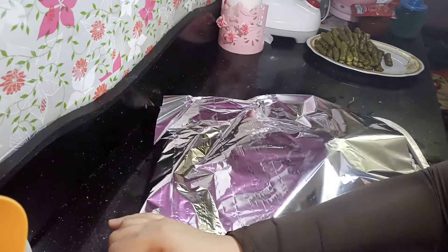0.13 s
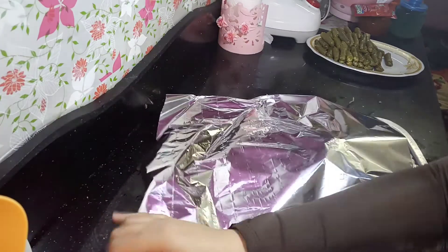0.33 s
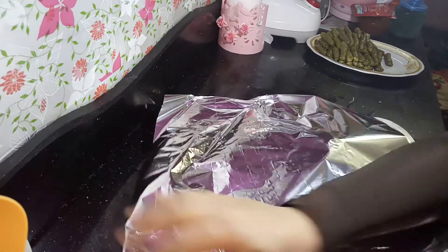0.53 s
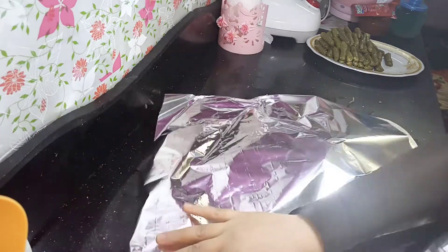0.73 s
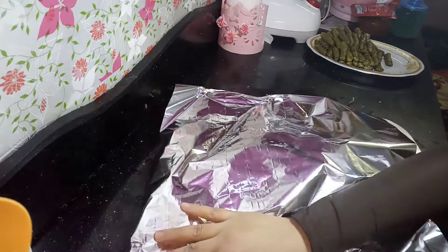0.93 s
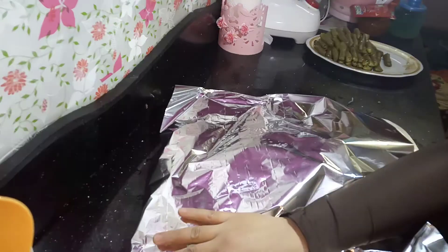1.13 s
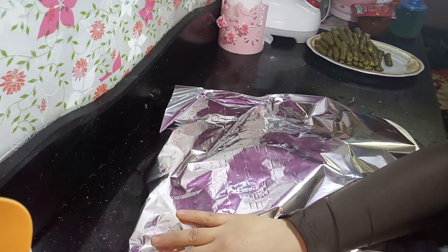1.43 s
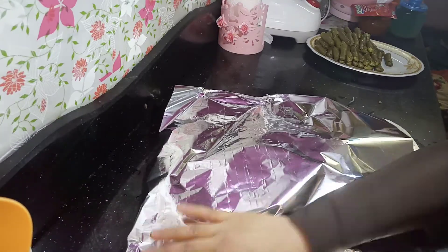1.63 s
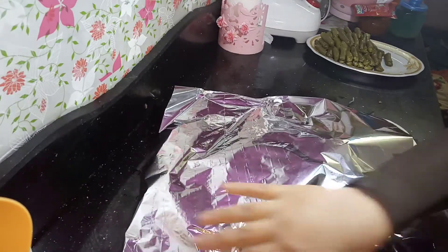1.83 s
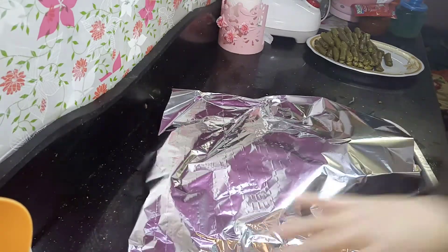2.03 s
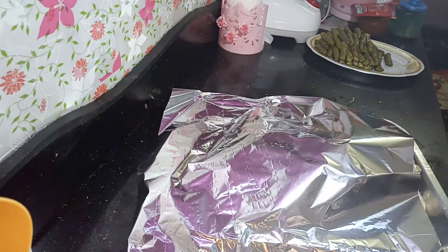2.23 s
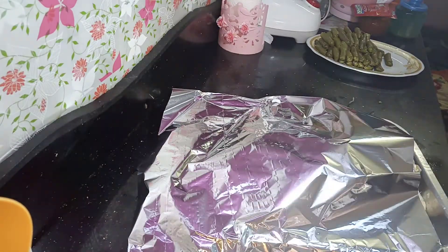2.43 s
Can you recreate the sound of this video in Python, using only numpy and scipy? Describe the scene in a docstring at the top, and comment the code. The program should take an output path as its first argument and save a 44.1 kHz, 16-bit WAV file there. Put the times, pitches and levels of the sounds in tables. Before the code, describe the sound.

Aluminium foil crinkles brightly as a hand smooths it over a metal tray, with palm rubbing and small crease snaps. It eases briefly, then gives a sharp crackle and fades, close up in a small kitchen.

```python
"""Smoothing foil over a tray

A hand pulls aluminium foil over a metal tray and smooths it down, close up in a small kitchen.
Swarms of tiny buckles crinkle in the sheet, the palm rubs over it and single creases snap.
Now and then the whole sheet flaps or the tray is nudged; the room answers briefly over a faint rumble."""
import sys
import numpy as np
from scipy import signal
from scipy.fft import rfft, irfft, next_fast_len
from scipy.io import wavfile
from scipy.ndimage import uniform_filter1d, map_coordinates

SR = 44100
rng = np.random.default_rng(int(sys.argv[2]) if len(sys.argv) > 2 else 0)


def generate_wav(signal):
    """Clip the signal to [-1, 1] and save it as 16-bit WAV at the path in sys.argv[1]."""
    frames = np.transpose(np.atleast_2d(signal))
    scaled = np.clip(frames, -1, 1) * 32767
    pcm = np.round(scaled).astype(np.int16)
    wavfile.write(sys.argv[1], SR, pcm)


N = 114660
ZONES = 7  # areas of the sheet, each on its own track
BUCKLE_SPREAD_DB = 2

# The hand's moves, as two fader rides (time [s], crinkle level [dB], rub level [dB])
HAND_MOVES = [(0.0, -26.5, -39), (0.049, -36, -45.5), (0.127, -28.5, -47), (0.161, -36, -42.5),
              (0.182, -18, -30), (0.24, -19, -31.5), (0.27, -24.5, -41), (0.343, -33.5, -41),
              (0.439, -26, -40.5), (0.621, -32, -46.5), (0.691, -25.5, -38.5), (0.776, -23.5, -33),
              (0.918, -28, -39), (1.1, -33.5, -43), (1.29, -34.5, -44), (1.45, -24.5, -39.5),
              (1.47, -28.5, -44), (1.5, -22, -39.5), (1.578, -37.5, -47.5), (1.679, -30.5, -43.5),
              (1.748, -39, -52), (1.768, -29, -47), (1.809, -49.5, -58.5), (1.886, -54.5, -55.5),
              (1.899, -33.5, -55), (1.925, -41.5, -55), (1.943, -27, -42), (2.009, -28, -40.5),
              (2.11, -41.5, -55), (2.149, -33, -51.5), (2.2, -37.5, -59), (2.218, -47.5, -54),
              (2.237, -16, -45), (2.251, -27.5, -48), (2.279, -27, -44.5), (2.291, -22, -61),
              (2.309, -34.5, -46.5), (2.389, -39, -55), (2.43, -33.5, -51), (2.469, -40, -56.5),
              (2.51, -32.5, -58), (2.53, -43, -58.5), (2.6, -49.5, -52)]
def crinkle(facets):
    """The sheet gives under the hand in clumps of tiny, bright buckles."""
    times, crinkle_db, _ = np.transpose(HAND_MOVES)
    t = np.arange(N) / SR
    clump_db, clumps_per_s, trim_db = 2.1, 50, -1
    clumps = clump_db * np.interp(t * clumps_per_s, np.arange(256), rng.standard_normal(256))
    level_db = np.interp(t, times, crinkle_db) + clumps + trim_db
    return swarm(level_db, facets, per_s=1200, spread_db=BUCKLE_SPREAD_DB, crowding=0.7)


def palm_rub(facets):
    """The palm moves in countless tiny slips: a dull rasp that also stirs the sheet's modes."""
    times, _, rub_db = np.transpose(HAND_MOVES)
    trim_db, stir_db = 2, 2.5
    level_db = np.interp(np.arange(N) / SR, times, rub_db) + trim_db
    slips = swarm(level_db, facets, per_s=3200, spread_db=7, crowding=0.34)
    return slips + amp(stir_db) * sheet_ring(slips.sum(axis=0)) / ZONES


# Accents from creases snapping through (time [s], relative level [dB])
CREASE_SNAPS = [(0.0937, -16.5), (0.164, -12.5), (0.208, -1), (0.2294, -7.5), (0.356, -17), (0.629, -14),
                (0.6644, -25), (0.694, -11), (0.757, -12), (0.816, -13), (0.949, -33), (1.1834, -14.5),
                (1.2394, -18), (1.393, -13), (1.449, -11), (1.484, -9.5), (1.655, -17), (1.8284, -29),
                (1.892, -19), (1.935, -18.5), (2.12, -18), (2.1847, -24), (2.2239, -7), (2.284, -15),
                (2.33, -22.5), (2.375, -22), (2.413, -19.5), (2.576, -31)]
def crease_snaps(facets):
    """Each crease gives way in a dense run of clicks; a big one has a slower attack."""
    envelope, t = np.full(N, 1e-5), np.arange(SR // 10) / SR
    slowest_rise_s, fade_s, trim_db = 0.003, 0.0093, -7.5
    biggest_db = max(db for _, db in CREASE_SNAPS)
    for start, db in CREASE_SNAPS:
        rise_s = slowest_rise_s * amp(db - biggest_db)
        add(envelope, start, amp(db + trim_db) * (1 - np.exp(-t / rise_s)) * np.exp(-t / fade_s))
    return swarm(20 * np.log10(envelope), facets, per_s=3000, spread_db=BUCKLE_SPREAD_DB, crowding=0)


def swarm(level_db, facets, per_s, spread_db, crowding):
    """A cloud of clicks on random facets, one track per zone; crowding makes loud stretches denser."""
    rate = per_s * amp(crowding * (level_db - level_db.mean()))
    fires = rng.random(N) < rate / SR
    kicks = fires * amp(spread_db * np.clip(rng.standard_normal(N), -2, 2))
    # Even out the power first, so that level_db alone rides the loudness.
    power = uniform_filter1d(uniform_filter1d(kicks ** 2, size=600), size=600)
    kicks = kicks / np.sqrt(np.abs(power) + 1e-6) * amp(level_db) * rng.choice([-1, 1], N)
    spot, zones = rng.integers(len(facets), size=N), np.zeros((ZONES, N))
    for i in np.flatnonzero(kicks):
        add(zones[spot[i] % ZONES], i / SR, kicks[i] * facets[spot[i]])
    return zones


# Tone curve of a buckle (frequency [Hz], level [dB])
BUCKLE_TONE = [(150, -34), (400, -12), (1100, -12), (1900, -4), (2900, 3), (3700, 5.5), (4700, 0),
               (7400, 0), (9600, -3.5), (12000, -2.5), (14400, 3.5), (16500, 2.5)]
def buckle_colour(hz):
    """A buckle's spectrum in dB: bright, with one broad resonance, the sheen, on top."""
    sheen_hz, width_hz, sheen_db = 7410, 1200, 14.5
    sheen = amp(sheen_db) ** 2 / (1 + (2 * (hz - sheen_hz) / width_hz) ** 2)
    return along(BUCKLE_TONE, hz) + 10 * np.log10(1 + sheen)


# Tone curve of the rubbing palm (frequency [Hz], level [dB])
SLIP_TONE = [(30, -45), (120, -7.5), (250, -13), (350, -12), (550, -7), (700, -6.5), (900, -2.5),
             (1400, -0.5), (2200, 0.5), (3000, 3.5), (4500, -6), (9000, -16), (16000, -48)]
def slip_colour(hz):
    """A slip's spectrum in dB: forward mids, little air."""
    return along(SLIP_TONE, hz)


def facet(colour, size=1024):
    """The grain from one spot of foil: a click and a short rattle through the sheet."""
    t = np.arange(size) / SR
    rattle = rng.standard_normal(size) * decay(t, t60=0.037)
    path = amp(3.5) * rattle / np.linalg.norm(rattle)
    path[0] += 1  # the direct click
    grain = signal.fftconvolve(path, click(colour, size))[:size]
    return grain / np.linalg.norm(grain)


def click(colour, size):
    """A sharp transient of the given colour, tinted at random."""
    hz = np.fft.rfftfreq(size, 1 / SR)
    tint_db = 1.5 * map_coordinates(rng.standard_normal(size=24), [np.linspace(0, 23, len(hz))])
    cepstrum = irfft(np.log(amp(colour(hz) + tint_db)))
    # Minimum phase packs the energy into the attack.
    cepstrum[1:size // 2] *= 2
    cepstrum[size // 2 + 1:] = 0
    pulse = irfft(np.exp(rfft(cepstrum)))
    return pulse / np.linalg.norm(pulse)


# EQ ride on the foil's upper mids (time [s], gain [dB])
MID_RIDE = [(0.9, -1), (1.4, -2), (1.5, -2.5), (2.0, -1), (2.15, -1)]
def thin_mids(foil):
    """The upper mids thin out a little, most around halfway, while the sheen stays."""
    gain = amp(np.interp(np.arange(N) / SR, *np.transpose(MID_RIDE)))
    mids = filtered(foil, lambda hz: np.interp(hz, [1700, 2600, 5500, 7000], [0, 1, 1, 0]))
    return foil + (gain - 1) * mids


# Modes of the sheet over the tray (frequency [Hz], relative level [dB], T60 [s])
SHEET_MODES = [(343, 2.5, 0.152), (497, -2, 0.15), (573, -2, 0.15), (577, -4, 0.035), (695, -1, 0.069),
               (786, 2, 0.076), (860, -5, 0.33), (1070, -4, 0.18), (1346, -7, 0.087)]
def sheet_ring(rub):
    """The sheet acts as a bank of resonators that gives the rub its body."""
    def resonance(f, hz, db, t60):
        width_hz = np.log(1000) / (np.pi * t60)
        return amp(db) * 1j * f * width_hz / (hz * hz - f * f + 1j * f * width_hz)
    return filtered(rub, lambda f: sum(resonance(f, *mode) for mode in SHEET_MODES))


# Flaps of the sheet (time [s], relative level [dB], centre pitch [Hz])
SHEET_FLAPS = [(.164, -26.5, 1360), (.186, -17, 1280), (.207, -21, 623), (.221, -25.5, 513),
               (.24, -23.5, 800), (.762, -30, 930), (.961, -30.5, 950), (1.182, -40, 342),
               (1.392, -40, 420), (1.44, -26, 505), (1.765, -37, 950), (1.893, -40, 996), (2.222, -30, 529)]
def sheet_flaps():
    """A panel of foil flaps with a quick, hollow pop."""
    return pushes(SHEET_FLAPS, SHEET_MODES, rise_s=0.0015, pop_t60_s=0.033)


# Modes of the tray on the counter (frequency [Hz], relative level [dB], T60 [s])
TRAY_MODES = [(62, -4, 0.12), (123, 7, 0.21), (172.5, -4.5, 0.35), (221, -1, 0.17), (356, 2.5, 0.11)]
# Bumps against the tray (time [s], relative level [dB], centre pitch [Hz])
TRAY_NUDGES = [(.165, -39.5, 302), (.222, -35, 147), (.651, -35, 176), (.72, -37, 170), (.756, -44, 177),
               (.787, -53, 177), (.893, -47, 197), (2.228, -38.5, 88.5)]
def tray_nudges():
    """Hand and fingers nudge the tray: soft, low knocks."""
    return pushes(TRAY_NUDGES, TRAY_MODES, rise_s=0.004, pop_t60_s=0.071)


def pushes(events, modes, rise_s, pop_t60_s):
    """A pushed spot swings briefly at its own sagging pitch and rings the modes nearest that pitch."""
    track, t = np.zeros(N), np.arange(SR // 4) / SR
    sag, reach_oct, modes_db = 0.13, 0.16, -5
    hz, mode_db, t60 = np.transpose(modes)
    rise, fade = 1 - np.exp(-t / rise_s), decay(t, pop_t60_s)
    mode_tones = np.exp(np.outer(2j * np.pi * hz - np.log(1000) / t60, t))
    for start, db, centre_hz in events:
        pitch = centre_hz * (1 + sag * (fade - 0.5))
        pop = fade * np.sin(2 * np.pi * np.cumsum(pitch) / SR)
        detune = np.log2(hz / centre_hz) / reach_oct
        gains = amp(modes_db + mode_db + rng.normal(0, 2.0, len(hz))) / (1 + detune ** 2)
        phases = np.exp(2j * np.pi * rng.random(len(hz)))
        ring = ((gains * phases) @ mode_tones).real
        add(track, start, amp(db) * rise * (pop + ring))
    return track


# Decay of the kitchen's reverb (frequency [Hz], T60 [s])
KITCHEN_DECAY = [(200, 0.058), (2000, 0.39), (8000, 0.22), (15000, 0.053)]
def kitchen_reverb(zones):
    """Each zone of the sheet wakes its own short room tail; the mids hang on longest."""
    hz, t, noise = signal.stft(rng.standard_normal((ZONES, SR // 4)), SR, nperseg=256)
    t60 = along(KITCHEN_DECAY, hz)[:, None]
    tails = signal.istft(noise * decay(t, t60) / np.sqrt(t60), SR, nperseg=256)[1]
    tails /= np.linalg.norm(tails, axis=1, keepdims=True)
    return signal.fftconvolve(zones, tails, axes=1)[:, :N].sum(axis=0)


# Tone curve of the kitchen's rumble (frequency [Hz], relative level [dB])
RUMBLE_TONE = [(25, -14), (50, -5.5), (75, -8.5), (98, 6), (135, -3), (170, 2), (250, -12), (500, -1),
               (1500, -50), (5000, -20), (16000, -39)]
def room_tone():
    """A faint, steady bed of low noise."""
    rumble = filtered(rng.standard_normal(N), lambda hz: amp(along(RUMBLE_TONE, hz)))
    return amp(-62) * rumble / np.sqrt(np.mean(rumble ** 2))


def amp(db):
    """Decibels to gain."""
    return 10 ** (np.asarray(db) / 20)


def decay(t, t60):
    """A fade that falls 60 dB in t60 seconds."""
    return np.exp(-np.log(1000) * t / t60)


def along(points, hz):
    """Read a curve on a log frequency axis."""
    freqs, values = np.transpose(points)
    return np.interp(np.log(hz + 1), np.log(freqs + 1), values)


def filtered(x, response):
    """EQ x with a gain given as a function of frequency."""
    size = next_fast_len(N + SR // 2)
    return irfft(rfft(x, size) * response(np.fft.rfftfreq(size, 1 / SR)), size)[..., :N]


def add(track, start_s, sound):
    """Mix a sound into the track."""
    i = max(0, round(start_s * SR))
    track[i:i + len(sound)] += sound[:N - i]


def scene():
    """The mono mix: foil with its reverb, dry flaps and nudges, room tone underneath."""
    bright = [facet(buckle_colour) for _ in range(42)]
    dull = [facet(slip_colour) for _ in range(21)]
    foil = thin_mids(crinkle(bright) + palm_rub(dull) + crease_snaps(bright))
    body = sheet_flaps() + tray_nudges()
    return (foil.sum(axis=0) + amp(-6) * kitchen_reverb(foil) + body + room_tone())[None]


def record(dry):
    """A brick-wall low-pass trims the very top."""
    return filtered(dry[0], lambda hz: hz < 15790)[None]


dry = scene()
out = record(dry)
generate_wav(out)
```